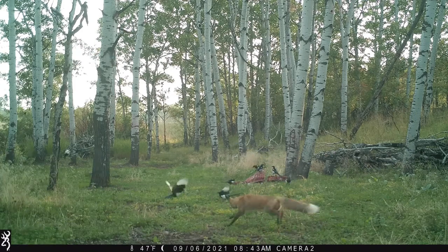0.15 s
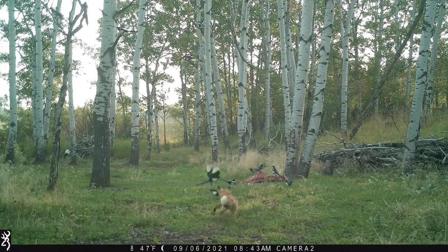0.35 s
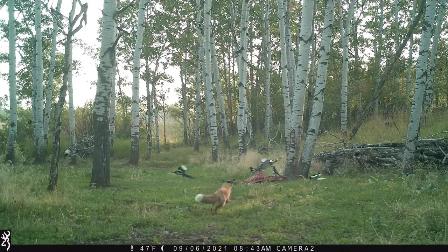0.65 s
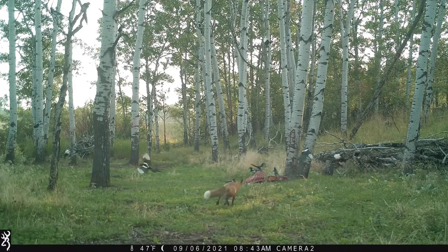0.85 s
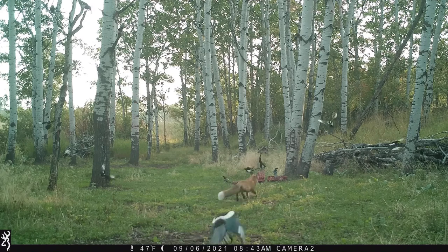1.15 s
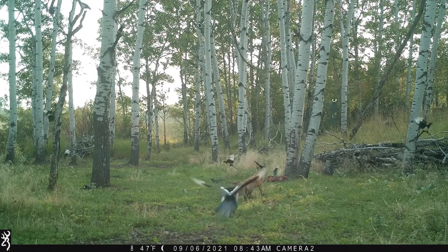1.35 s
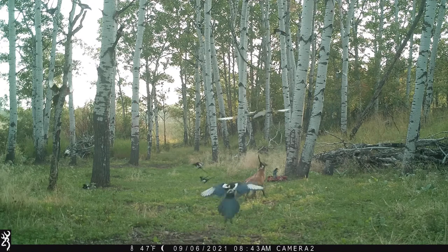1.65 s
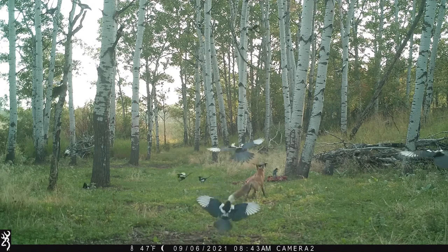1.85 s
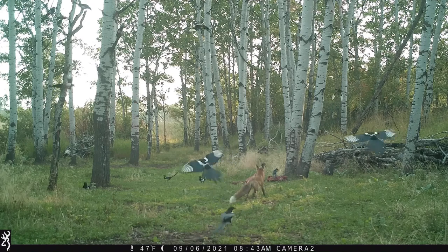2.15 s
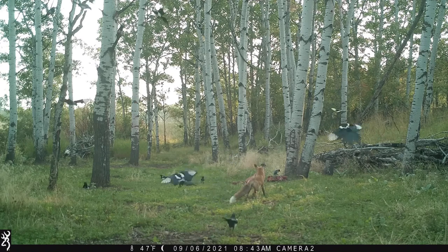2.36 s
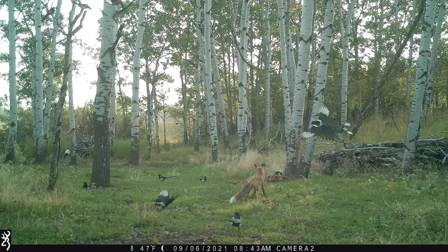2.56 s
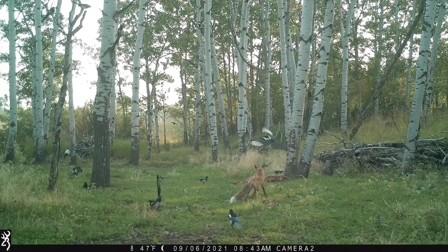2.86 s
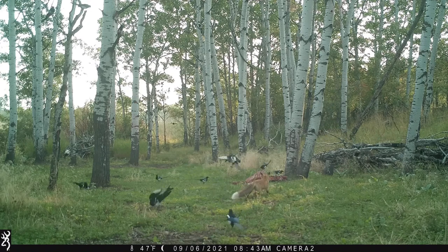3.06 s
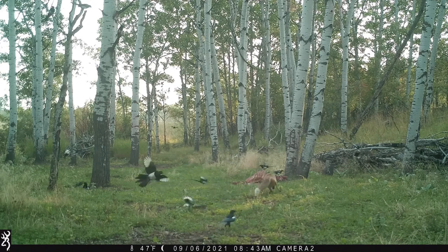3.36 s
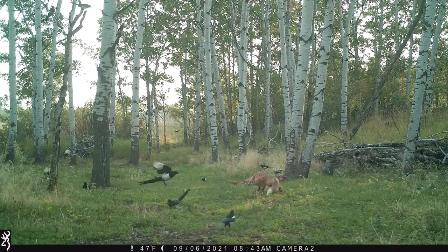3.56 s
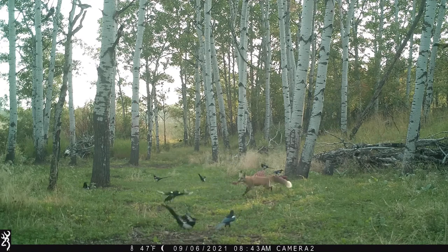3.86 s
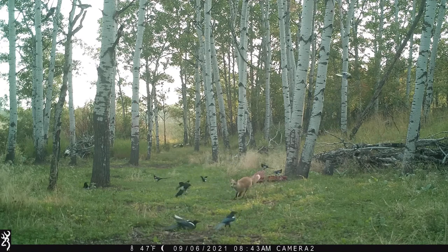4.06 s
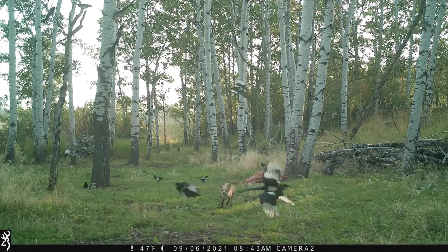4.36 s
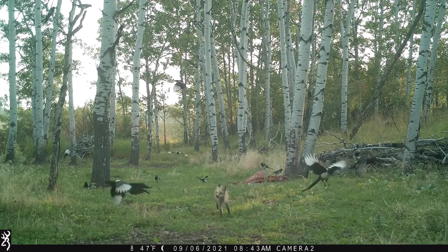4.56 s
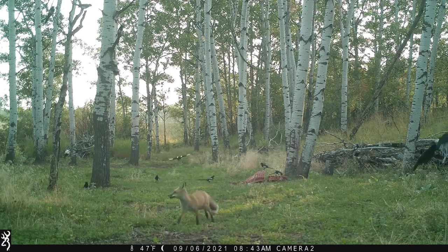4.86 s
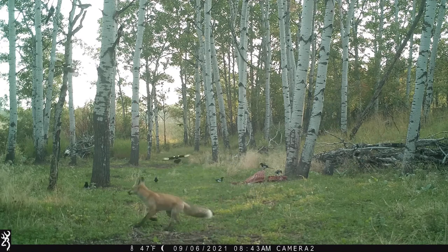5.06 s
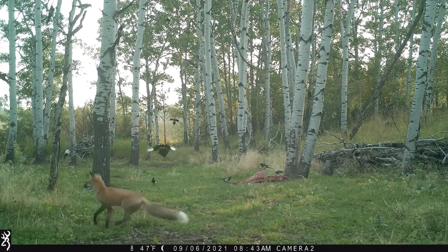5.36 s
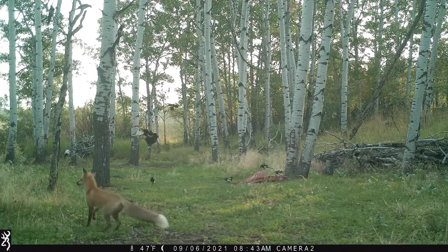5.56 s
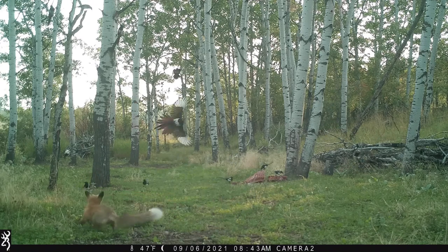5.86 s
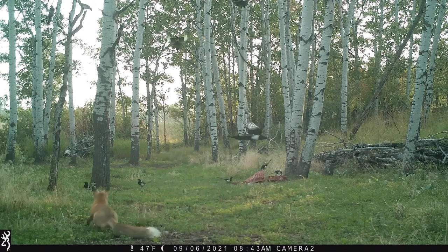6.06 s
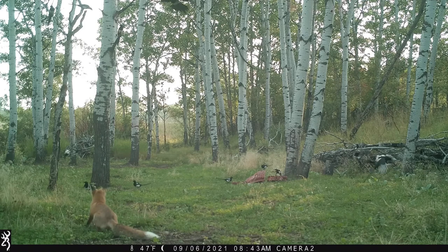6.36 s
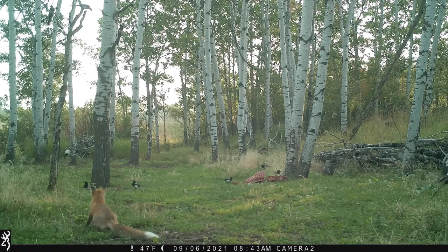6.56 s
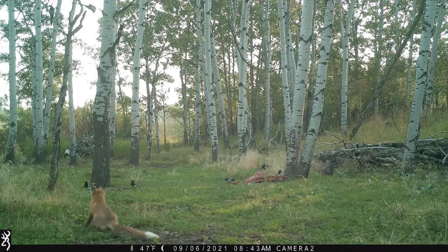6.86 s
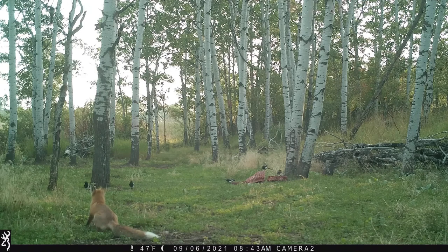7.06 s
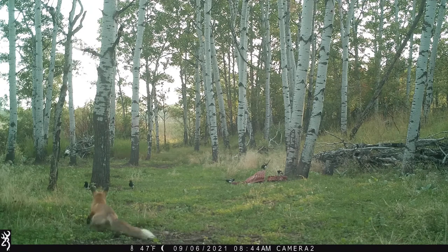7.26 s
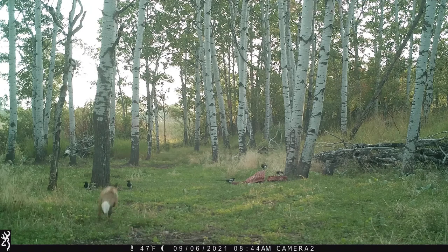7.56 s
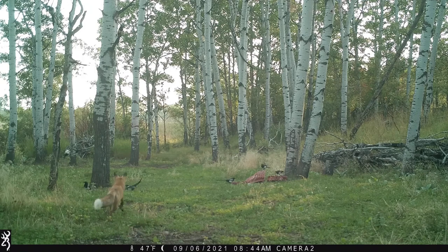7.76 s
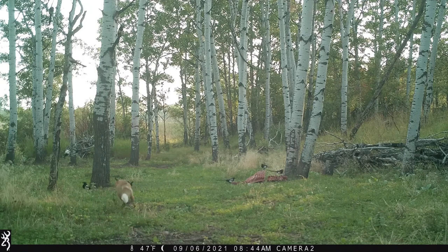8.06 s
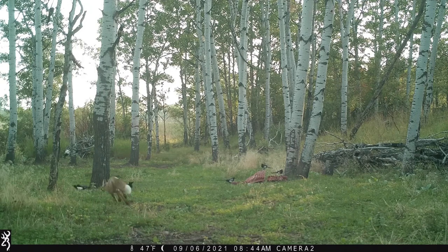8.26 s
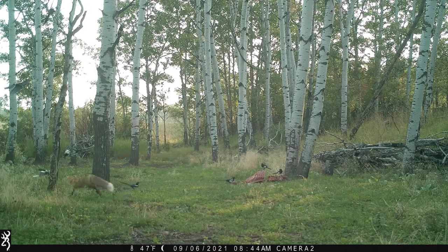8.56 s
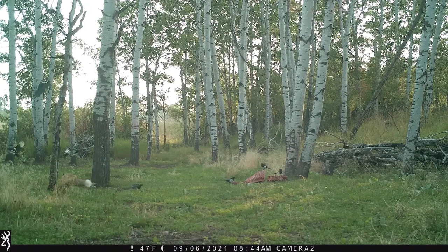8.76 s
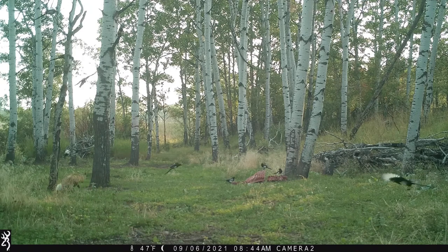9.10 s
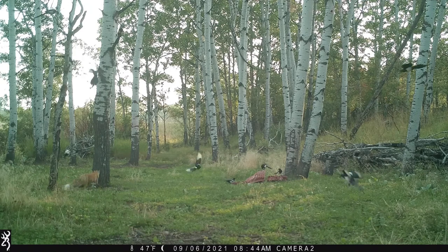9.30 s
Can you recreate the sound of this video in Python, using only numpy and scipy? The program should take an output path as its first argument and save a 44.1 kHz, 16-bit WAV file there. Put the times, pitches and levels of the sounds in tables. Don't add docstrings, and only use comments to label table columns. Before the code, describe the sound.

Open woodland with thin trunks, heard through a small outdoor microphone with thin hiss and faint low air. A soft wing gust opens, and a first couple of harsh magpie notes rasp at about 0.5 s. A sharp snap lands at 1.0 s, then overlapping rattles run quickly to 2 s and continue as steady, separate raspy notes about five per second until 3.7 s, weakening. After a short gap, rattling resumes at 4.2 s with another sharp snap at 4.35 s. From 4.5 to 5.7 s one very close bird gives a loud, hard, clipped volley of rising, buzzing notes. A lull follows with tiny peeps and ticks around 6.1-6.5 s. Four more close notes come at 6.8-7.3 s, then distant, echoing chatter, with a dull hollow knock near 7.75 s. From 8.5 s overlapping rattles grow stronger, ending about 9.4 s.

```python
import sys
import numpy as np
from scipy import signal
from scipy.fft import rfft, irfft, next_fast_len
from scipy.io import wavfile
from scipy.ndimage import map_coordinates

SR = 44100
rng = np.random.default_rng(int(sys.argv[2]) if len(sys.argv) > 2 else 0)


def generate_wav(signal):
    frames = np.transpose(np.atleast_2d(signal))
    scaled = np.clip(frames, -1, 1) * 32767
    pcm = np.round(scaled).astype(np.int16)
    wavfile.write(sys.argv[1], SR, pcm)


def undo_db(level):
    steps = np.asarray(level, float) / 20
    return 10 ** steps


N = 415863

# pitch top t/s, length before it/s, peak level/dB, top pitch f/Hz
FLOCK_NOTES = [(0.466, 0.07, -18, 767), (0.611, 0.079, -13.5, 824), (1.041, 0.07, -19, 733),
               (1.09, 0.24, -18.5, 708), (1.185, 0.077, -15.5, 733), (1.234, 0.073, -17.5, 768),
               (1.385, 0.13, -14.5, 798), (1.526, 0.13, -14.5, 717), (1.613, 0.17, -18, 754),
               (1.689, 0.078, -15.5, 775), (1.776, 0.083, -15.5, 794), (1.857, 0.082, -17, 738),
               (1.945, 0.08, -14, 825), (2.106, 0.091, -17, 750), (2.3, 0.13, -18, 707),
               (2.493, 0.11, -16.5, 825), (2.683, 0.11, -16, 838), (2.878, 0.11, -16.5, 834),
               (3.071, 0.12, -18, 822), (3.238, 0.097, -22, 776), (3.27, 0.041, -23, 814),
               (3.394, 0.098, -18.5, 745), (3.558, 0.09, -20, 768), (3.74, 0.099, -21, 772),
               (4.166, 0.07, -19.5, 712), (4.294, 0.099, -17, 744), (4.421, 0.073, -16.5, 753)]
CLOSE_NOTES = [(4.523, 0.073, -2.5, 862), (4.682, 0.089, -4.5, 854), (4.835, 0.092, -3.5, 814),
               (5.006, 0.1, -4.5, 834.4), (5.174, 0.1, -1.5, 829), (5.35, 0.11, -2.5, 854),
               (5.519, 0.097, -2, 800.5), (5.566, 0.076, -15, 812), (5.693, 0.11, -2.5, 787.4),
               (6.76, 0.11, -8.5, 768), (6.916, 0.1, -7, 764), (7.087, 0.11, -8, 777.5),
               (7.267, 0.11, -8.5, 775)]
TREE_NOTES = [(7.375, 0.083, -22.5, 811), (7.531, 0.12, -23, 820), (7.691, 0.12, -23, 872),
              (7.861, 0.23, -23.5, 840), (8.032, 0.1, -21.5, 825), (8.223, 0.084, -19.5, 849),
              (8.407, 0.092, -19.5, 732), (8.526, 0.077, -13, 894), (8.566, 0.049, -18.5, 842),
              (8.656, 0.077, -17, 769), (8.785, 0.11, -15.5, 818), (8.889, 0.069, -14, 871),
              (9.032, 0.17, -11.5, 846), (9.184, 0.19, -10, 808), (9.352, 0.1, -10, 763),
              (0.9, 0.11, -39.5, 755)]
# t from the top/s, share of top pitch
PITCH_SWEEP = [(-.13, .5), (-.09, .57), (-.05, .65), (-.025, .78), (0, 0.99), (.004, 0.96), (.013, .76),
               (.024, .6)]
# start t/s, fall/s, echo level/dB, clear share,
BOUTS = [(.2, 0.012, -7.5, 0.57, -7), (.53, 0.017, -5.5, 0.84, -14), (.8, 0.0099, -1, 1, -8),
         (1.3, 0.0097, -8, 0.6, -5.5), (2, 0.015, -9.5, 0.56, -7.5), (3, 0.0069, -9.5, 0.57, -4.5),
         (3.254, 0.0061, -4.5, 0.75, -10), (3.33, 0.0061, -7.5, 0.54, -9.5), (4, 0.0022, -7.5, 0.44, -7.5),
         (4.47, 0.021, -12, 0.81, -6.5), (5.08, 0.019, -17, 0.75, -7), (6.3, 0.0089, -15.5, 0.74, -7),
         (7.32, 0.0089, -4.5, 0.3, -7.5), (8.3, 0.018, -6.5, 0.62, -7), (8.7, 0.0077, -6.5, 0.46, 0),
         (8.83, 0.032, -3.5, 0.56, -7), (8.95, 0.022, -9, 0.54, -7.5)]
# chest, deep throat, shallow throat, sizzle, brightness level/dB
VOICES = [(-1.5, -1.5, -1.5, -5, 1), (-1.5, 2, -1, -6.5, 0.5), (5, 1.5, -5, -2, 2.5),
          (1, -4.5, 1, 0.5, 1.5), (1.5, 3.5, 2.5, -1, 4.5), (3, 2, -0.5, -1, -1.4),
          (18, 2, -0.5, -0.5, 32.5), (4.5, 4.5, -3, -4, 2.3), (2, -5, -7, -2, -6.2),
          (-0.5, -3.5, -2, -1, 1.5), (0.5, -1.5, 1, 1, 2.5), (0.5, 2, 3, 2.5, 4.8),
          (-2.5, -2, -7.5, -1.5, 1.2), (3, 2.5, 0, 1.5, 3.4), (5, 1, -1, -1, 0), (-1, 0.5, 0, 5.5, -1),
          (0.5, -1, -4, 0.5, -0.2)]
# number, level/dB
OVERTONES = [(1, 2.5), (2, .5), (3, -1), (4, 5), (5, -5), (6, -3.5), (7, -4.5), (9, -10), (12, -15)]
# f/Hz, level per Hz/dB
CHEST = [(250, -46), (500, -22), (800, -14), (1070, -17), (1400, -4), (1700, 5.5), (2100, -0.5),
         (2600, -7.5), (4000, -48)]
DEEP_THROAT = [(1200, -39.5), (1900, -9.5), (2250, -6), (2500, -2), (2750, -0.5), (3200, -21),
               (4000, -16.5), (6000, -44.5)]
SHALLOW_THROAT = [(1500, -43.5), (2400, -13.5), (2750, 2.5), (2950, -1.5), (3200, -5.5), (3600, -12),
                  (4200, -19), (6000, -51.5)]
BEAK = [(3600, -25), (4300, -10), (4750, -1.5), (5100, 1.5), (5600, -3.5), (6100, -8.5), (8000, -38.5)]
SIZZLE = [(5000, -31), (6300, -17), (7200, 1.5), (7900, 6), (8600, -1), (9500, -6.5), (11000, -14.5),
          (15400, -30)]
# start t/s, end t/s, lag/ms, level/dB
GROUND_BOUNCES = [
    (.5, .7, .6, -11),
    (2.2, 3, .575, -9),
    (3, 3.8, .6, -13),
    (6.3, 7.32, 2.352, -6),
]
# f/Hz, t60/s
TRUNK_T60 = [(500, 0.32), (2500, 0.62), (5000, 0.68), (10000, 0.58)]
# t/s, length/s, level/dB, pitch f/Hz, arch share, rise share
PEEPS = [
    (6.067, 0.068, -37, 814, 0.19, 0.034),
    (6.439, 0.011, -35.5, 705, .03, 0.011),
    (6.546, 0.011, -41, 730, .03, 0.068),
    (7.663, 0.11, -40, 670, 0.0091, 0.33),
]
# t/s, level/dB, trunk mode level/dB, box mode level/dB
KNOCKS = [
    (1.032, -43.5, 11.5, -4),
    (7.751, -31.5, -3, -13),
    (7.939, -46, -18, 2),
    (8.288, -50, 11, 8),
    (8.475, -49.5, 12, 3),
]
# f/Hz, level/dB, t60/s
PERCH_MODES = [(94.5, -3, 0.67), (205, 6.5, 0.11), (248.3, 1, 0.45), (439, 10, 0.18), (706, 5.5, 0.085)]
# t/s, peak level/dB
TICKS = [
    (0.0594, -48),
    (0.182, -50),
    (0.386, -13),
    (1.0207, -0.5),
    (4.0167, -19),
    (4.3547, -4),
    (4.58, -11),
    (6.2267, -24),
    (6.438, -20),
]
# t/s, peak level/dB, half width/s
GUSTS = [(.25, -24.5, .06), (.45, -44, .04), (.72, -32, 0.033), (1.05, -50, 0.066), (1.21, -38.5, .03),
         (1.39, -38, .04), (1.52, -30.5, 0.013), (1.63, -34, 0.021), (1.78, -53, 0.034), (3.0, -48, .15),
         (3.18, -41, 0.017), (3.55, -37.5, 0.16), (4.22, -35, 0.062), (4.49, -22, 0.0076),
         (5.16, -51, 0.027), (6.85, -74, 0.13), (7.41, -41, 0.0199), (8.72, -43, 0.044)]
# t/s, peak level/dB, half width/s
FLURRIES = [
    (1.35, -53, 0.4),
    (4.5, -46.5, 0.1),
    (5.2, -58.5, 0.81),
    (7.04, -56, .3),
    (8.8, -62, 0.95),
]
# f/Hz, level per Hz/dB
BUFFET = [(12, -25), (20, 6), (67, -5.5), (125, -15.5), (168, -34), (300, -48), (390, -66), (660, -120)]
MURMUR = [(60, 1.5), (150, 0.5), (400, -2.5), (1000, -10), (2500, -30), (5000, -44)]
HISS = [(500, -0.5), (1500, -1), (5000, -0.5), (11000, -7), (15000, -11)]

LEAD_S = .15
USUAL_LENGTH_S, SWELL_DB_PER_S = .1, 90
CALM_BUFFET_DB, CALM_AIR_DB = -54.5, -51.5
TOP_HZ = 15500


def rattle(notes):
    out = np.zeros(N)
    shapes = (CHEST, DEEP_THROAT, SHALLOW_THROAT, BEAK, SIZZLE)
    tract = np.array([response(shape) for shape in shapes])
    for s, length_s, db, top_hz in notes:
        bout = sum(row[0] < s for row in BOUTS) - 1
        fall_s, echo_db, clear, opening_db = BOUTS[bout][1:]
        chest_db, deep_db, shallow_db, sizzle_db, bright_db = VOICES[bout]
        opening_db = opening_db - SWELL_DB_PER_S * (length_s - USUAL_LENGTH_S)
        source, effort_db = note(top_hz, length_s, opening_db, clear, fall_s)
        level_db = db - 0.5 - 10 * np.log10(1 + undo_db(2 * bright_db))
        shares_db = np.array([
            chest_db - 8.0 - 0.45 * effort_db,
            deep_db - 0.27 * effort_db,
            shallow_db + 0.069 * effort_db,
            bright_db + 2.5 + 0.98 * effort_db,
            bright_db + sizzle_db - 2.5 + 0.84 * effort_db])
        wander_db = 1.7 * wobble(35, len(tract) * len(source)).reshape(len(tract), -1)
        driven = undo_db(level_db + shares_db + wander_db) * source
        heard = signal.fftconvolve(driven, tract, axes=1).sum(axis=0)
        add(out, s - LEAD_S, bounced(heard, s))
        add(out, s - LEAD_S, undo_db(echo_db) * echoes(heard, gap_s=.004))
    return out


def note(top_hz, length_s, opening_db, clear, fall_s):
    t = np.arange(SR // 5) / SR - LEAD_S
    clear = np.clip(clear, .5, .85) * np.interp(t, [-.06, -.03], [.65, 1])
    jitter = (.05 - .045 * clear) * wobble(500, len(t))
    pitch_hz = top_hz * np.interp(t, *np.transpose(PITCH_SWEEP)) * (1 + jitter)
    phase = 2 * np.pi * np.cumsum(pitch_hz) / SR

    k = np.arange(1, 13)[:, None]
    tuned = np.where(k == 4, np.interp(t, [-.06, -.035], [0, 1]), 1)
    unrest = np.where(k == 4, 1 - .4 * tuned, np.minimum(.45 + k / 7, 1.3))
    breaks, drift = wobble(80, 2 * k.size * len(t)).reshape(2, k.size, -1) * unrest
    strength = undo_db(tuned * np.interp(k, *np.transpose(OVERTONES)) + 4.5 * breaks - 2.5)
    angle = k * phase + 1.1 * drift + rng.uniform(0, 6.3, k.shape)
    pulses = np.sqrt(4 * pitch_hz / SR) * np.sum(strength * np.cos(angle), axis=0)

    rasp = unit(rng.standard_normal(len(t)) * (1 + 0.15 * np.cos(phase)))
    share = np.sqrt(1 - clear)
    rasp = share * rasp + (1 - share) * coloured(rasp, [(5000, -40), (7000, 0), (20000, 0)])

    start, peak = -length_s, -min(.018, length_s / 2)
    times = [start - .045, start - .035, start - .002, start + .008, peak, 0, fall_s, 2 * fall_s]
    levels_db = [-70, opening_db - 40.5, opening_db - 20.5, opening_db - 1.0, 0, -2.5, -14, -60]
    effort_db = np.interp(t, times, levels_db)
    sound = undo_db(effort_db + 0.37 * wobble(200.1, len(t))) * (np.sqrt(clear) * pulses + rasp)
    return sound, np.clip(effort_db + 35 * np.minimum(t, 0), -30, 0)


def bounced(x, s):
    hz = np.fft.rfftfreq(len(x), 1 / SR)
    for start, end, lag_ms, db in GROUND_BOUNCES:
        if start < s < end:
            comb = 1 + undo_db(db) * np.exp(-2j * np.pi * hz * lag_ms / 1000)
            return irfft(rfft(x) * comb, len(x)) / np.hypot(1, undo_db(db))
    return x


def echoes(x, gap_s):
    hz, t, z = signal.stft(rng.standard_normal(SR // 2), SR, nperseg=256)
    t60 = np.interp(hz, *np.transpose(TRUNK_T60))[:, None]
    decay = undo_db(-60 * t / t60) * (1 - np.exp(-t / gap_s))
    tail = signal.istft(z * decay, SR, nperseg=256)[1]
    return signal.fftconvolve(x, tail / np.linalg.norm(tail))


def peeps():
    out = np.zeros(N)
    for s, length_s, db, hz, arch, rise in PEEPS:
        u = np.linspace(-1, 1, round(length_s * SR))
        phase = 2 * np.pi * np.cumsum(hz * (1 - arch * np.abs(u) ** 3 + rise * u)) / SR
        overtones = np.sin(2 * phase) + undo_db(-5) * u ** 2 * np.sin(3 * phase) + undo_db(-16) * np.sin(phase)
        tone = undo_db(db) * np.sqrt(1 - u ** 2) * overtones
        add(out, s, tone)
        add(out, s, undo_db(-5) * echoes(tone, gap_s=.005))
    return out


def knocks():
    out, t = np.zeros(N), np.arange(SR // 2) / SR
    for s, db, trunk_db, box_db in KNOCKS:
        ring = np.zeros(len(t))
        for (hz, mode_db, t60), extra_db in zip(PERCH_MODES, [0, 0, trunk_db, box_db, 0]):
            ring += undo_db(mode_db + extra_db - 60 * t / t60) * np.sin(2 * np.pi * hz * t)
        add(out, s, undo_db(db) * ring * (1 - np.exp(-t / 0.001)))
    return out


def ticks():
    out, t = np.zeros(N), np.arange(SR // 20) / SR
    for s, db in TICKS:
        add(out, s, undo_db(db - 20.0 - 60 * t / 0.059) * rng.standard_normal(len(t)))
    return coloured(out, HISS)


def air():
    noise = rng.standard_normal((3, N))
    buffet = swells(GUSTS, CALM_BUFFET_DB) * unit(undo_db(4 * wobble(14, N)) * coloured(noise[0], BUFFET))
    murmur = swells(FLURRIES, CALM_AIR_DB) * undo_db(2.0 + 1.0 * wobble(6.0, N)) * coloured(noise[1], MURMUR)
    hiss = undo_db(-47.5 + 0.11 * wobble(3.9, N)) * coloured(noise[2], HISS)
    return buffet + murmur + hiss


def swells(rows, calm_db):
    t = np.arange(0, N / SR, .002)
    level = undo_db(calm_db) + sum(undo_db(db) * np.exp(-.5 * ((t - s) / width_s) ** 2) for s, db, width_s in rows)
    return np.interp(np.arange(N) / SR, t, level)


def wobble(rate_hz, size):
    knots = rng.standard_normal(size // 64 + 4)
    return map_coordinates(knots, [np.arange(size) * min(rate_hz, 600) / SR], order=1)


def along(points, hz):
    f, db = np.transpose([(1, -120), *points, (SR, -120)])
    return np.interp(np.log(hz + 1), np.log(f + 1), db)


def response(points):
    size = 4096
    cepstrum = irfft(np.log(undo_db(along(points, np.fft.rfftfreq(size, 1 / SR)))))
    cepstrum[1:size // 2] *= 2
    cepstrum[size // 2 + 1:] = 0
    ring = irfft(np.exp(rfft(cepstrum)))[:size // 2]
    return ring / np.linalg.norm(ring)


def coloured(x, points):
    return signal.fftconvolve(x, response(points))[:len(x)]


def unit(x):
    return x / np.sqrt(np.mean(x ** 2) + 1e-20)


def add(track, s, x):
    part = track[round(s * SR):][:len(x)]
    part += x[:len(part)]


def scene():
    birds = rattle(FLOCK_NOTES + CLOSE_NOTES + TREE_NOTES) + peeps()
    return (birds + knocks() + ticks() + air())[None]


def band_limit(x):
    return signal.sosfilt(signal.butter(12, 15600, fs=SR, output="sos"), x)


def record(dry):
    size = next_fast_len(N)
    saturated = dry / (1 + np.abs(dry / 1.05) ** 6) ** (1 / 6)
    passed = np.fft.rfftfreq(size, 1 / SR) < TOP_HZ
    band = irfft(rfft(saturated, size) * passed, size)[:, :N]
    return band_limit(np.clip(1.037 * band, -1, 1))


dry = scene()
out = record(dry)
generate_wav(out)
```